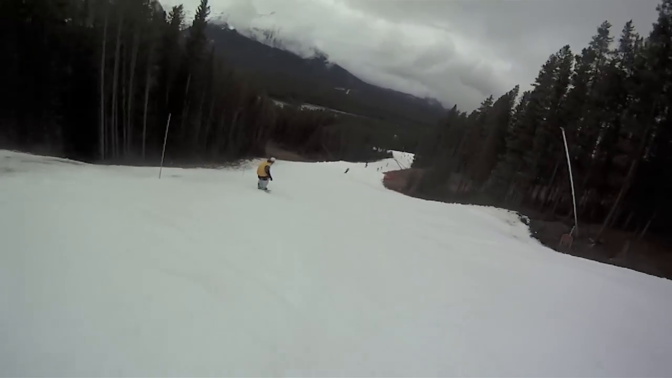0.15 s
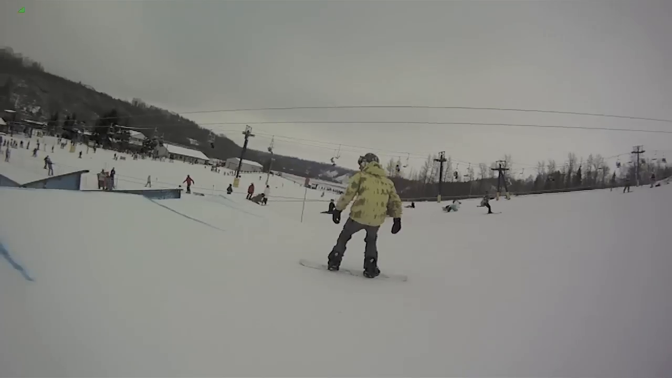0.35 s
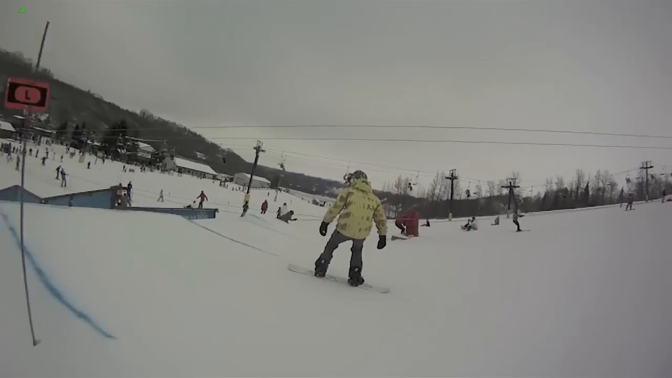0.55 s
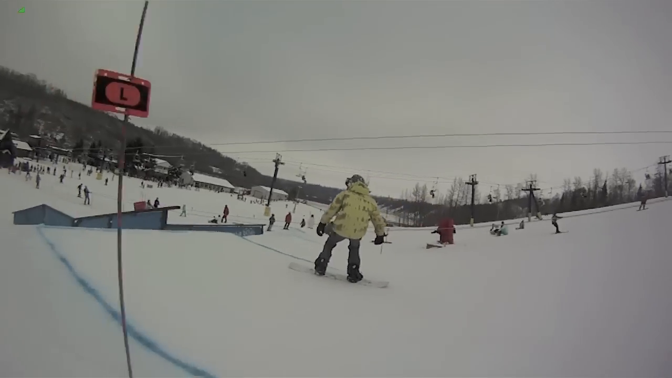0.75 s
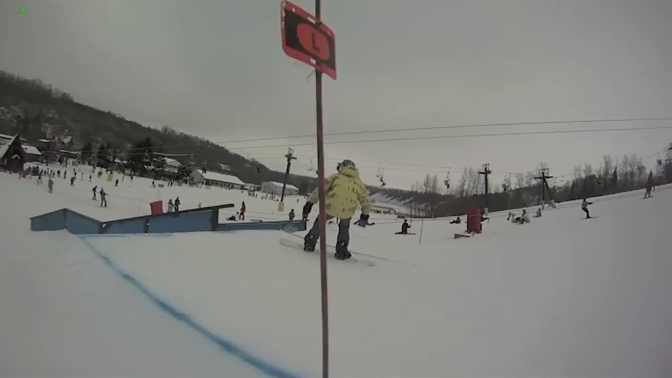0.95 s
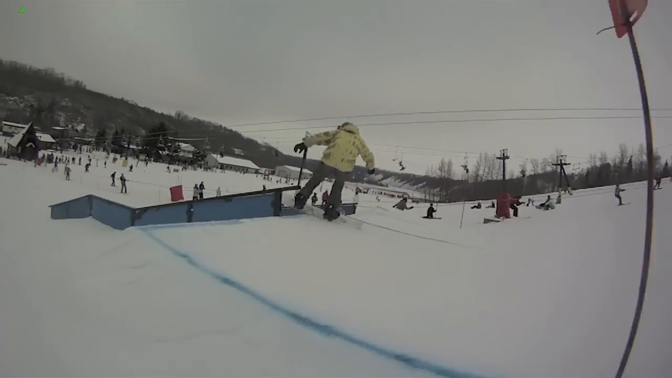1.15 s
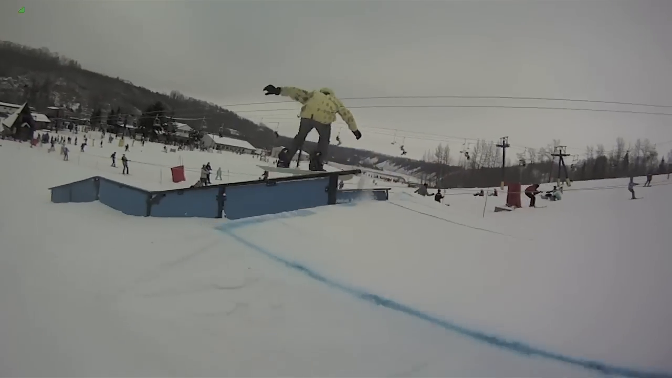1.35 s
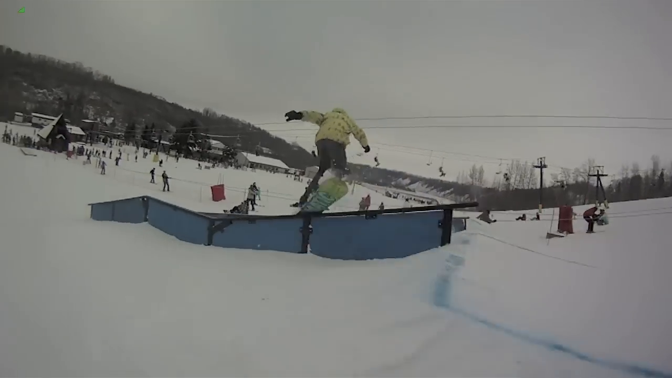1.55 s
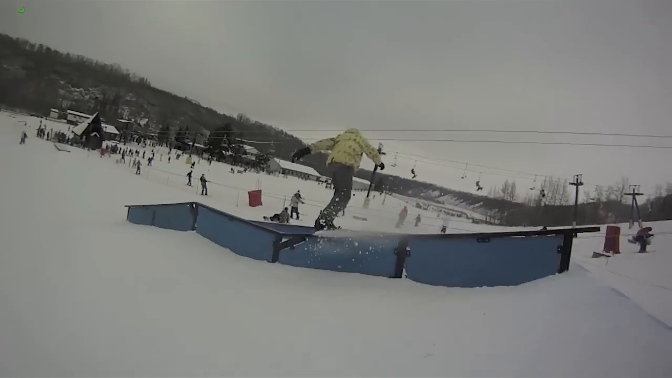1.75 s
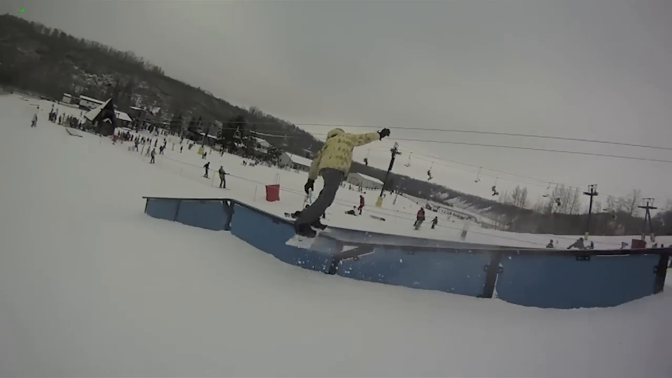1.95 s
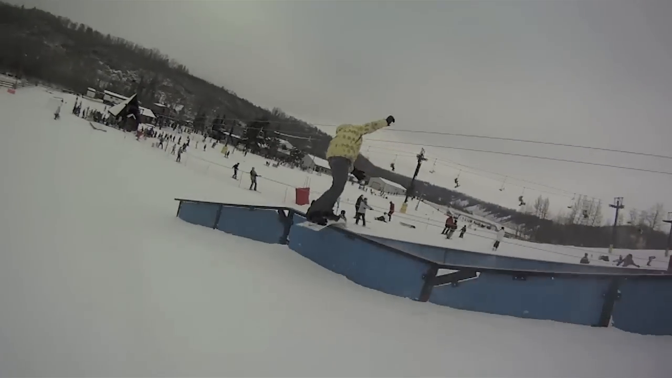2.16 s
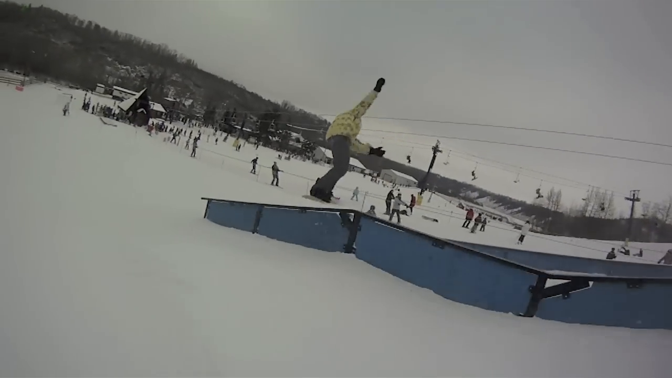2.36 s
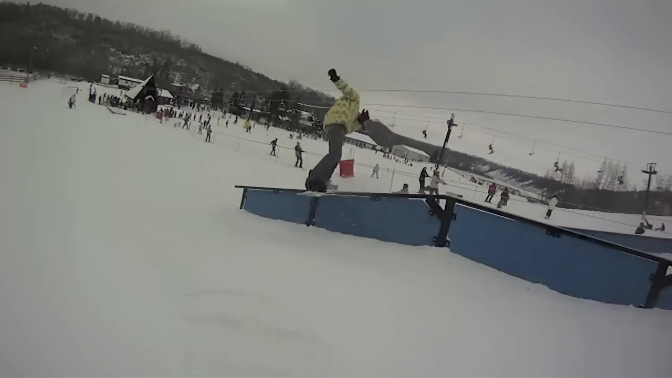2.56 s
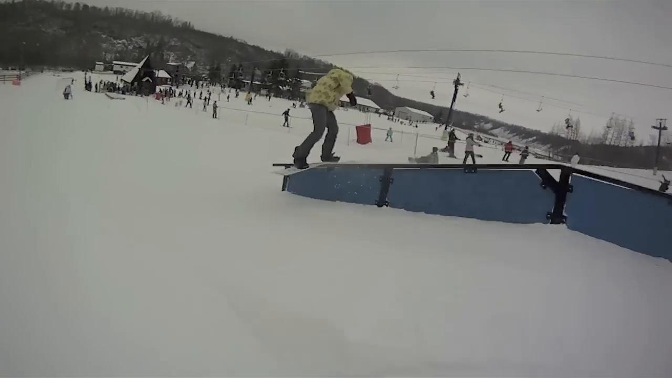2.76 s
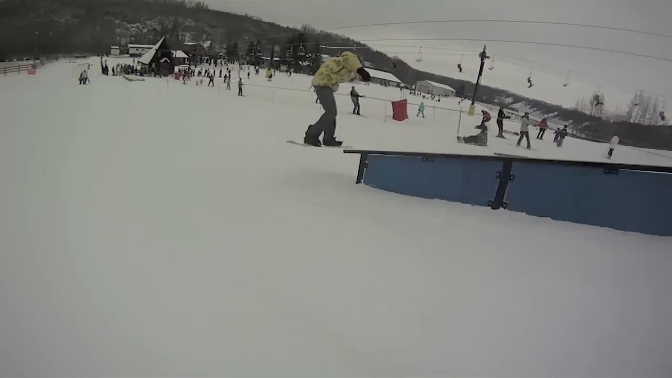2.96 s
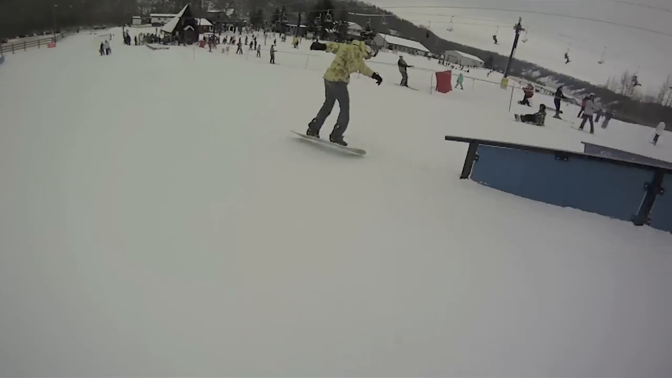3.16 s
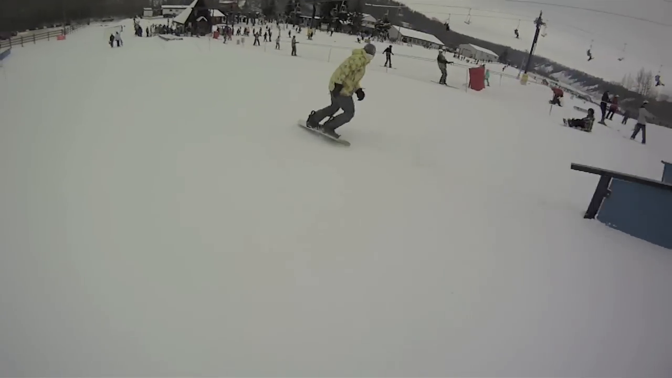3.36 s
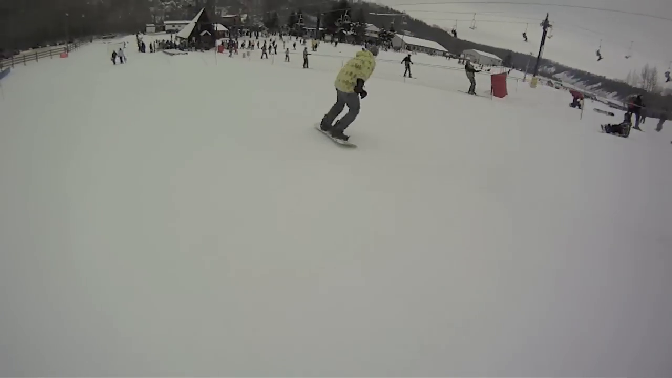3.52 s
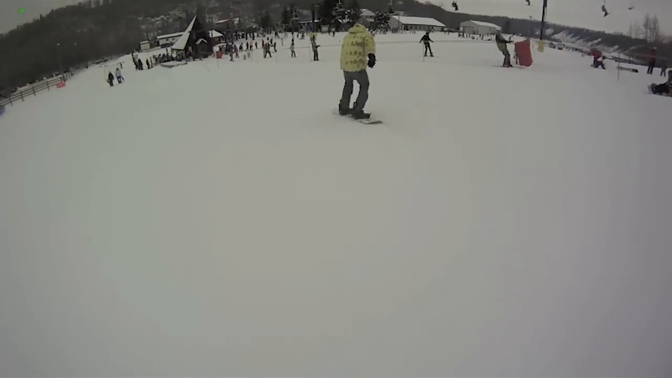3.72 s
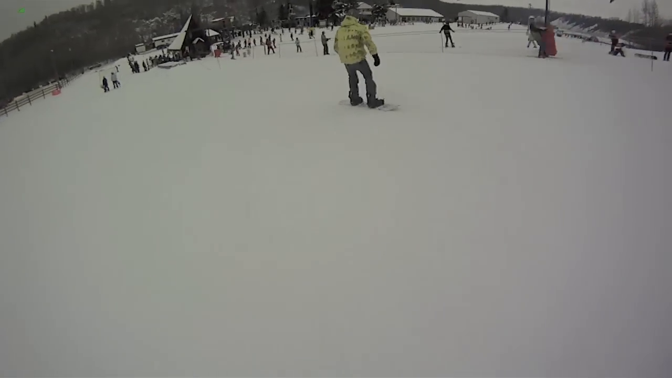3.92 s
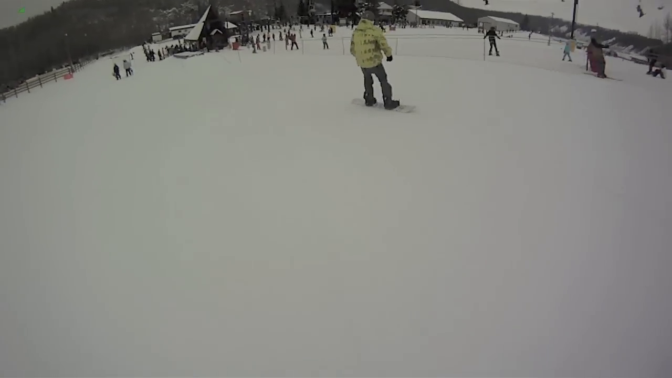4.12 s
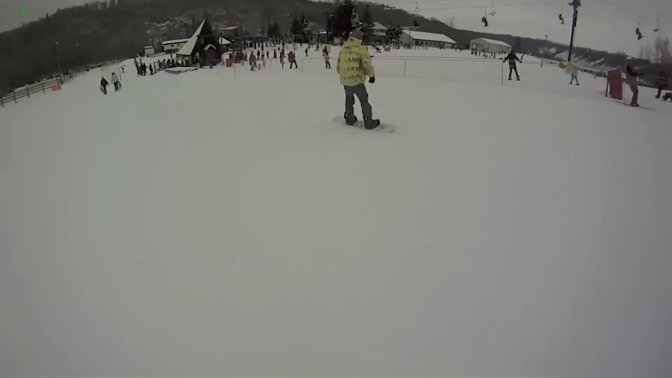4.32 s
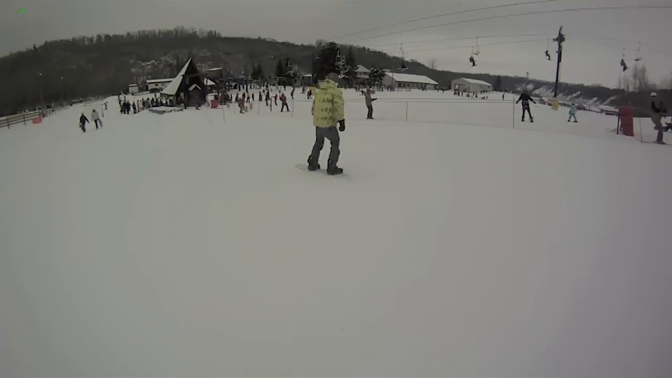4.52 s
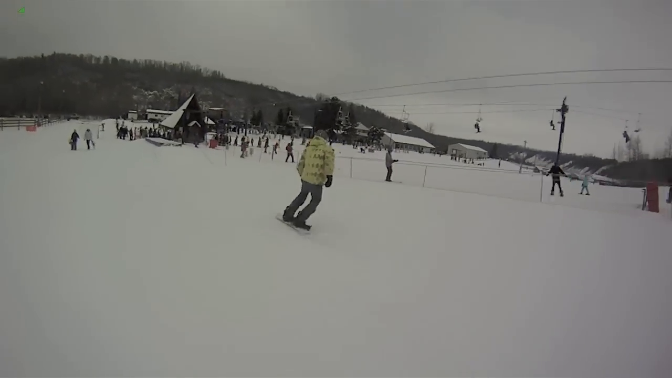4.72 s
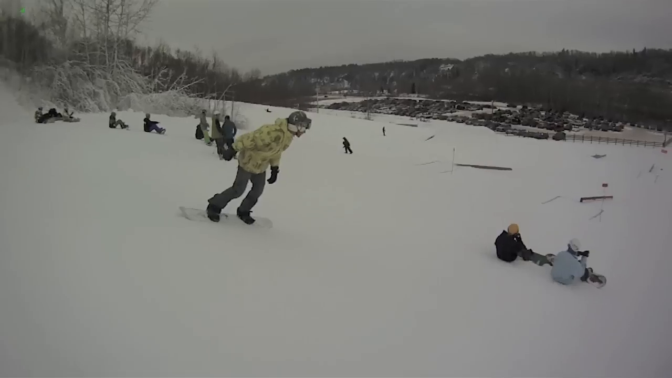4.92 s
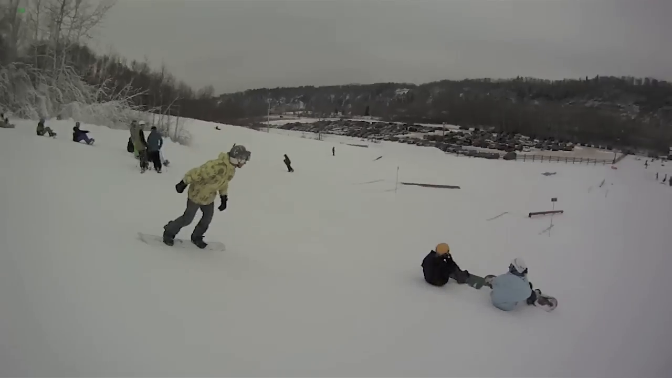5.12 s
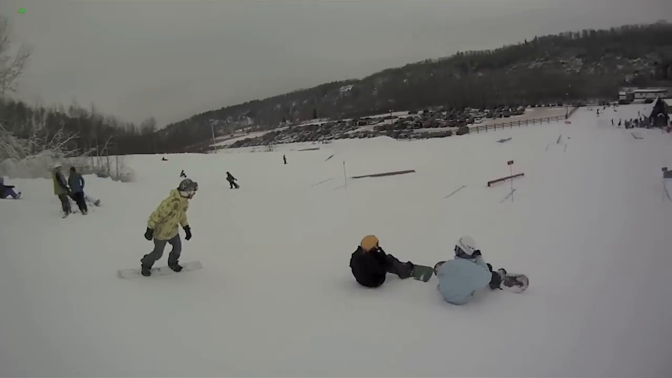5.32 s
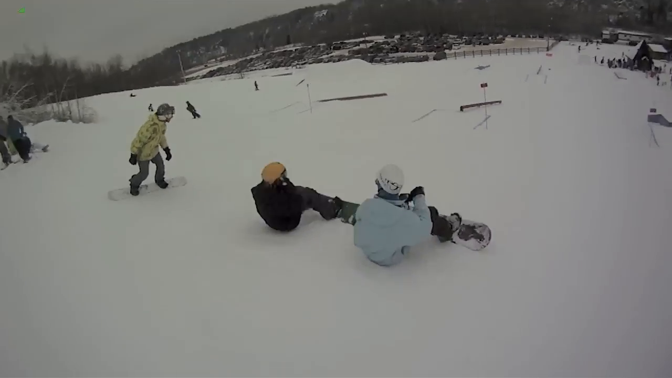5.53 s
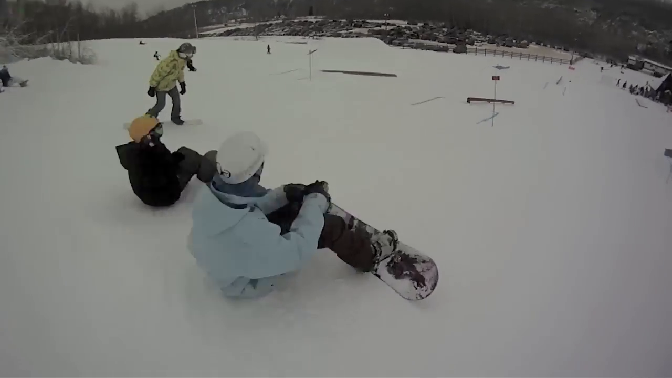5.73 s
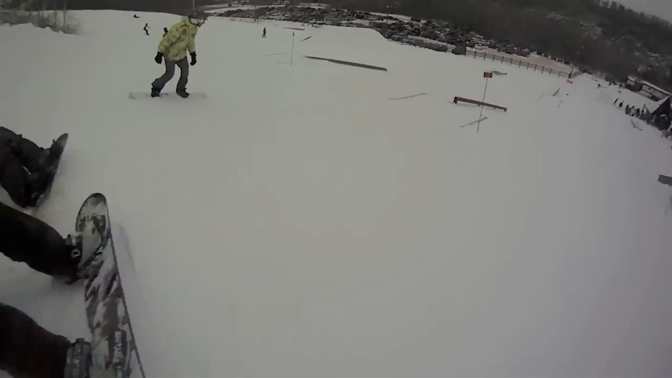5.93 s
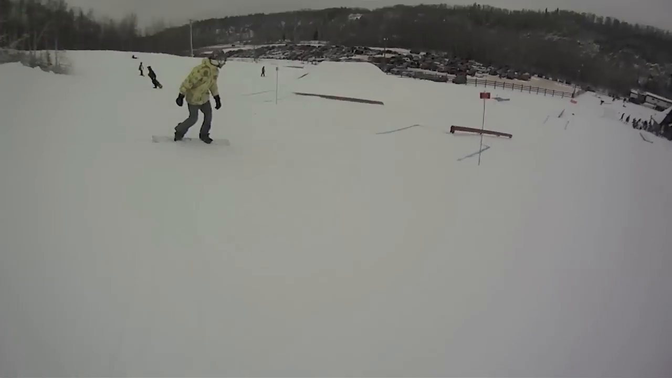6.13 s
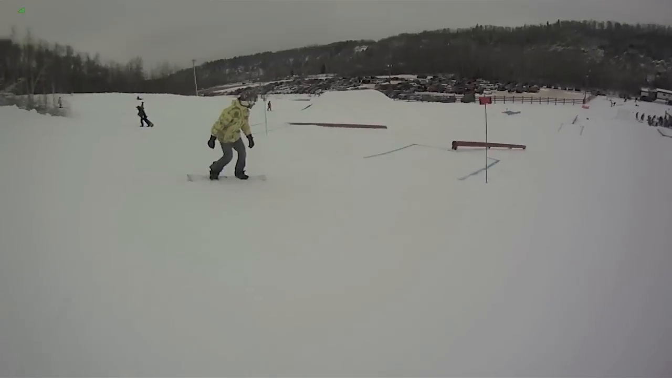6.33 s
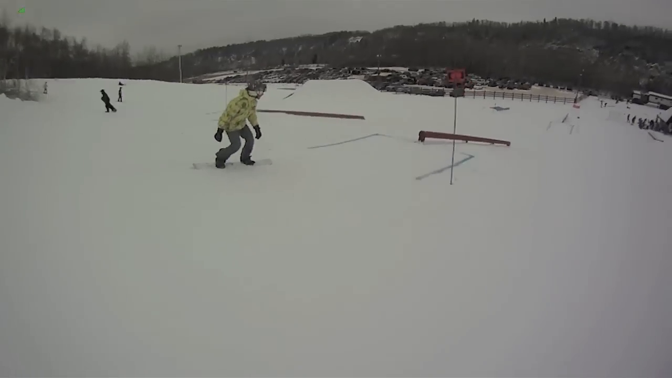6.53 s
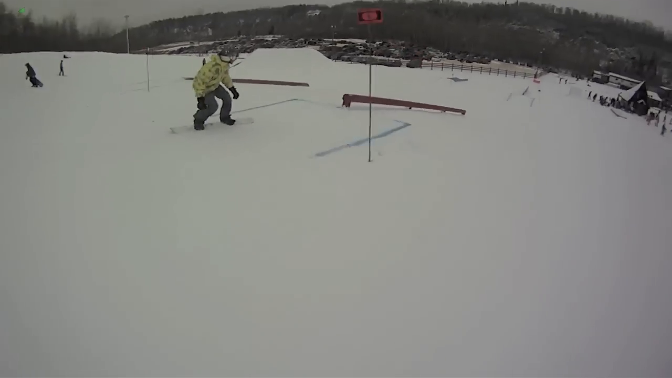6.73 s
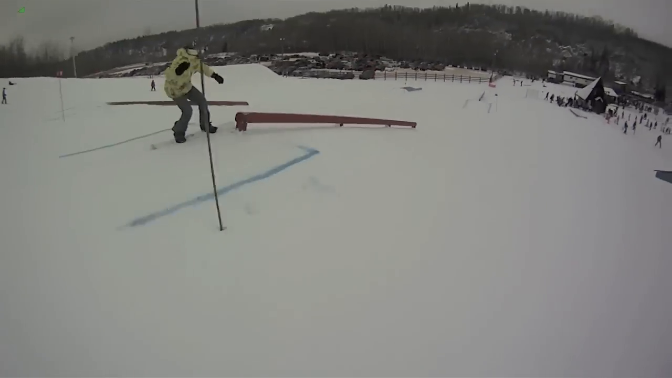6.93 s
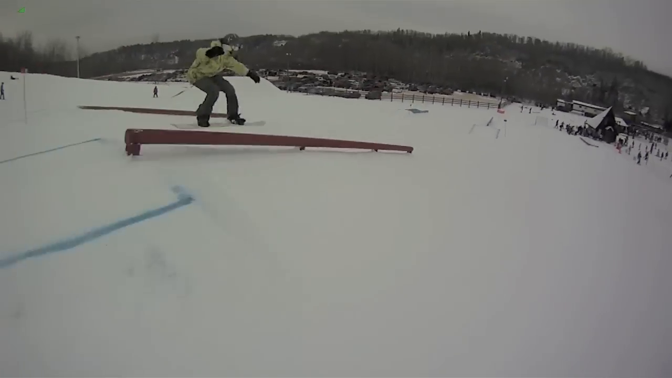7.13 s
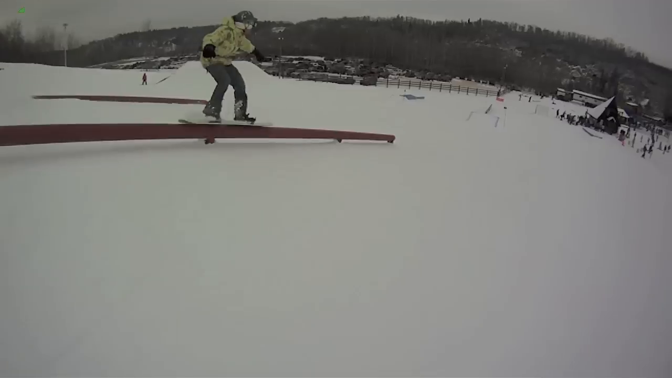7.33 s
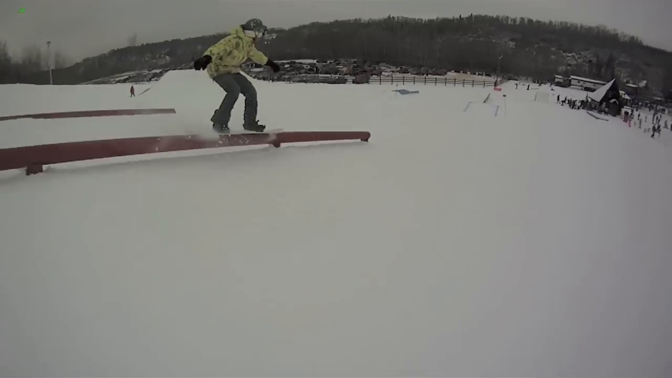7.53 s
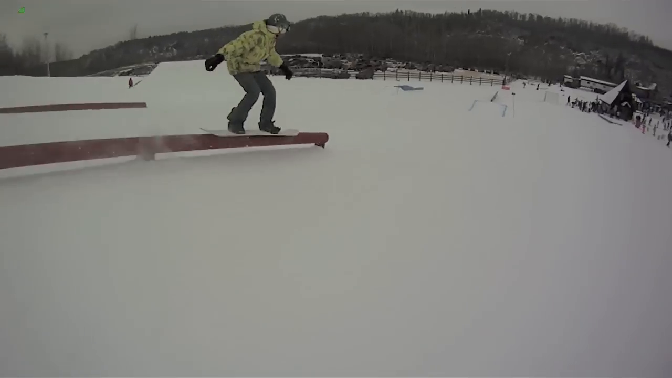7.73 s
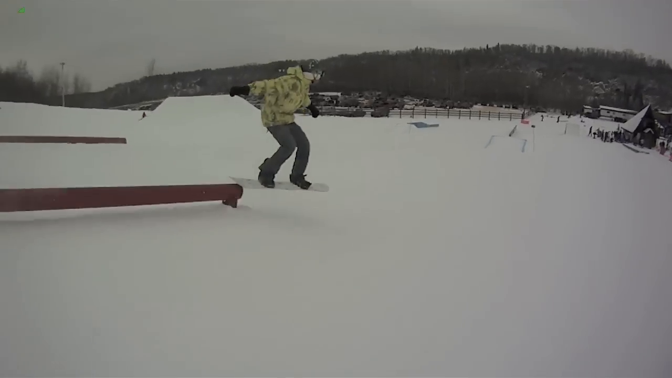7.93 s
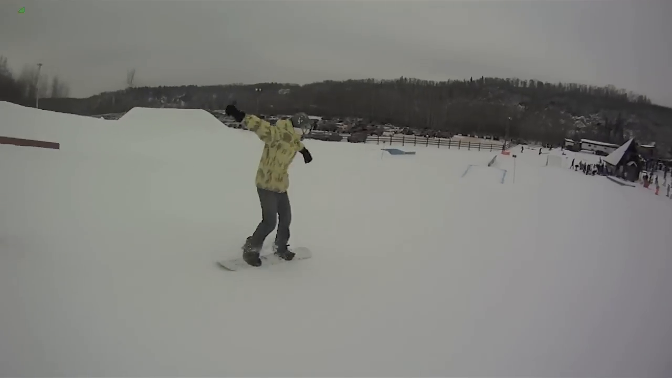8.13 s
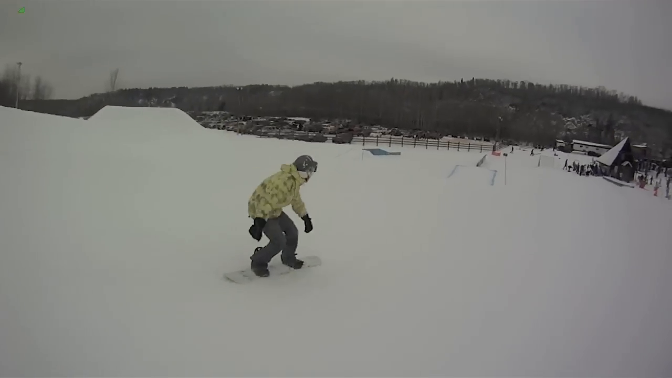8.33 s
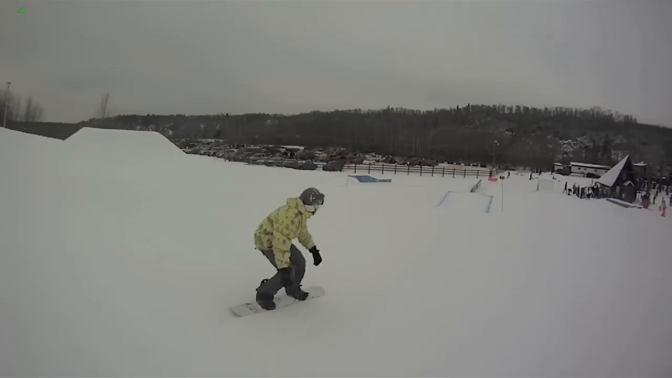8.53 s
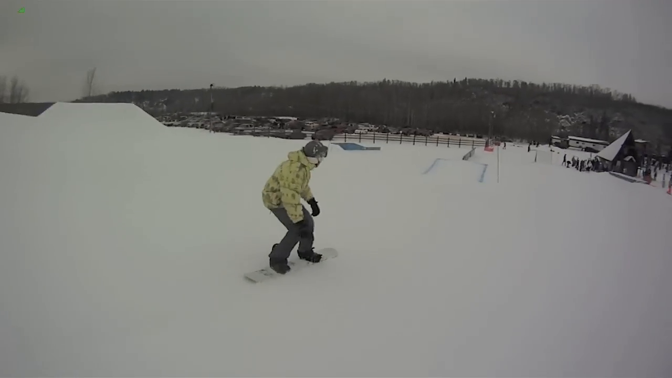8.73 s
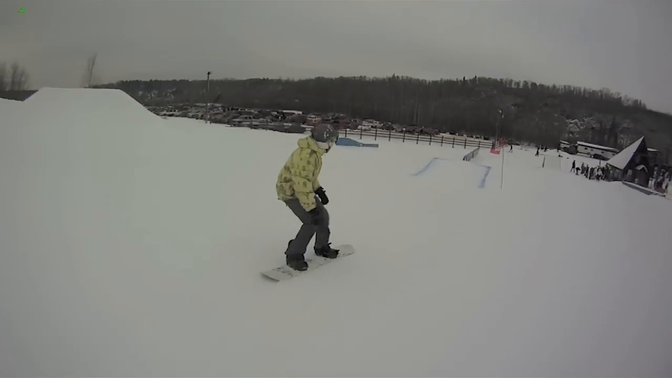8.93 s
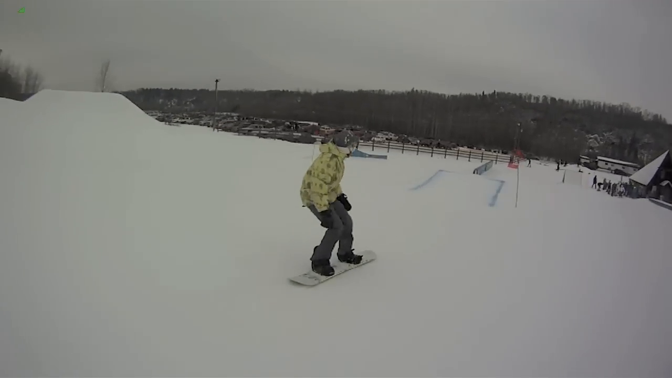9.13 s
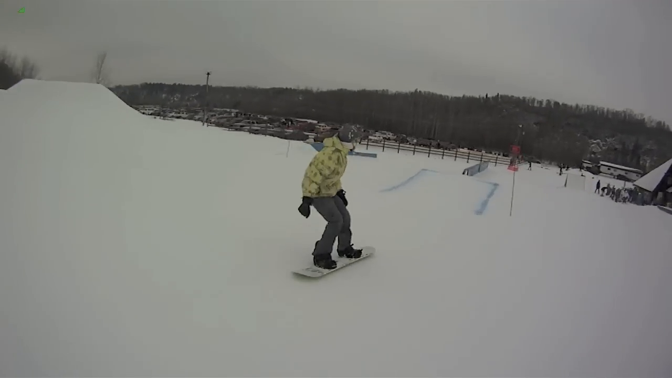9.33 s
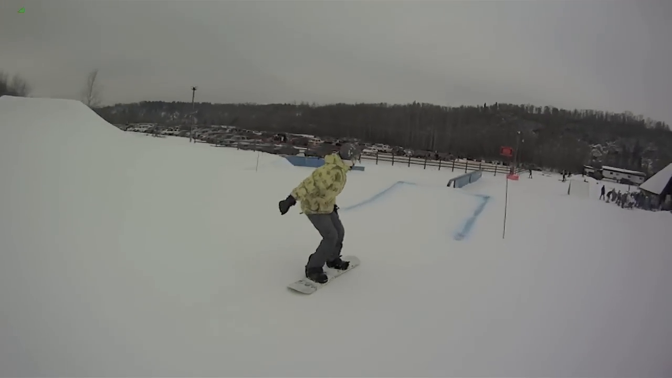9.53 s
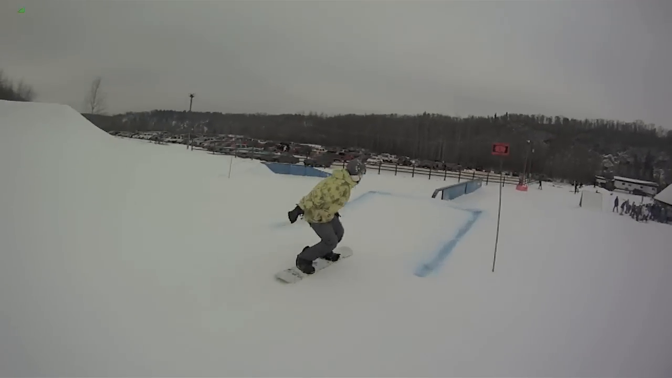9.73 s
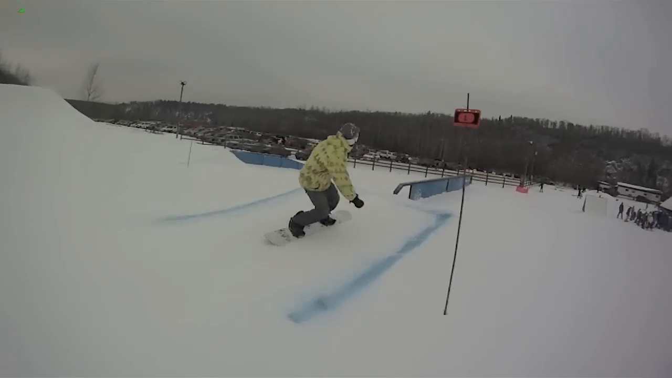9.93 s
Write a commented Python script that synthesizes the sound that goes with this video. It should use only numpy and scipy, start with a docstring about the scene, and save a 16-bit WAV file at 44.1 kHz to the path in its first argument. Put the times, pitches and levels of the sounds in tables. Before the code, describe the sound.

On an open ski slope, a close cased action-camera microphone picks up a snowboard's hissing edge, then a quieter glide with wind buffeting. A hard clack lands on a box, small knocks and soft bumps follow, then a heavy crunching carve. The base drone grows louder, a sharp rattling knock meets a steel rail with a faint ring, and scraping continues to the end.

```python
"""A scraping, hissing board edge is heard first; then the base drones as a snowboard glides down a packed slope.
Filtered noise makes the drone, wind and rumble; random grains within noise make the scrape, spray and crunches.
Sharp knocks, soft bumps and a faint steel rail reach a cased microphone, and sharp, bright ticks crackle on top.
The level of all but the ticks dips briefly twice. Slow sampling with each sample held
mirrors all but the ticks into a gritty treble."""
import sys
import numpy as np
from scipy import signal
from scipy.io import wavfile
from scipy.ndimage import uniform_filter1d

SR = 44100
rng = np.random.default_rng(int(sys.argv[2]) if len(sys.argv) > 2 else 0)


def master_out(mix):
    """Clip the mix to full scale and print it as 16-bit PCM to the path in sys.argv[1]."""
    frames = np.transpose(np.atleast_2d(mix))
    ceiling = np.clip(frames, -1, 1)
    pcm = np.round(ceiling * 32767).astype(np.int16)
    wavfile.write(sys.argv[1], SR, pcm)


N = 439677
T = np.arange(N) / SR


def amp(db):
    """Logarithmic level: decibels to an amplitude ratio."""
    return 10 ** (np.asarray(db) / 20)


def unit(x):
    """Power normalisation: scales to rms 1."""
    return x / np.sqrt(np.mean(x ** 2) + 1e-20)


def curves(*tables):
    """Linear interpolation: joins tables in time and returns each column sample by sample."""
    times, *columns = np.transpose(np.vstack(tables))
    return [np.interp(T, times, column) for column in columns]


def add(mix, start_s, sound):
    """Superposition: adds a sound to the mix from a given time."""
    part = mix[round(start_s * SR):][:len(sound)]
    part += sound[:len(part)]


def colour(x, spectrum, resonances=(), size=16384):
    """Minimum-phase filtering: a causal response from a smooth spectrum and resonant lifts."""
    hz = abs(np.fft.fftfreq(size, 1 / SR))
    points_hz, level_db = np.transpose(spectrum)
    db = np.interp(np.log(hz + 1), np.log(points_hz + 1), level_db)
    for centre_hz, width_hz, lift_db in resonances:
        db = db + lift_db / (1 + (2 * (hz - centre_hz) / width_hz) ** 2)
    # the Hilbert transform of the log magnitude gives the minimum phase
    log_response = np.conj(signal.hilbert(np.log(amp(db))))
    response = np.fft.ifft(np.exp(log_response)).real
    return signal.oaconvolve(x, response[:size // 2])[:len(x)]


def wander(per_s):
    """Random modulation: unevenness of rms 1 drawn anew per_s times a second and joined by lines."""
    draws = rng.standard_normal(N // 8)
    return unit(np.interp(T * per_s, np.arange(N // 8), draws))


def swell(peak_s, length_s):
    """Smooth envelope: rises to 1 at peak_s and has fallen to 1/e at length_s on either side."""
    squareness = 2.44  # 2 = a bell shape, more = a flatter top
    distance = np.minimum(abs((T - peak_s) / length_s), 5)
    return np.exp(-distance ** squareness)


def crunch(grains_per_s, spread_db, share):
    """Shot noise: snow crystals break as separate grains of uneven size within a smooth hiss."""
    sizes = amp(spread_db * np.minimum(rng.exponential(1, N), 4))
    breaks = rng.random(N) < grains_per_s / SR
    grains = sizes * rng.choice([-1, 1], N) * breaks
    hiss = rng.standard_normal(N)
    return np.sqrt(share) * unit(grains) + np.sqrt(1 - share) * hiss


# slow turbulence: (frequency [Hz], relative level [dB per Hz])
WIND = [(2, -29), (9, -1), (23, 0.5), (38, -3), (52, -12.5), (70, -19.5), (110, -32), (200, -49),
        (600, -83)]
# wind strength on the case: (time [s], level before the gain [dB])
GUSTS = [(0, -39.5), (0.22, -52), (0.47, -37), (0.7, -44), (1.4, -42.5), (2.4, -47.5), (2.62, -41),
         (3.1, -40), (4.2, -44), (4.85, -44.5), (5.15, -38), (5.85, -34.5), (6.2, -48), (6.75, -34),
         (7.15, -39), (7.38, -32.5), (7.75, -37.5), (9.68, -32.5), (9.9, -41.5)]


def wind():
    """Turbulent pressure: slow eddies push on the case with the strength of each gust."""
    gain_db = 2
    (wind_db,) = curves(GUSTS)
    eddies = unit(colour(rng.standard_normal(N), WIND))
    # evens out the eddies within one gust
    eddies /= np.sqrt(uniform_filter1d(eddies ** 2, size=6000) + 0.024)
    return eddies * amp(wind_db + gain_db)


# fast eddies and case shake: (frequency [Hz], relative level [dB per Hz])
EDDIES = [(30, -27), (70, 0.5), (105, -1), (160, -4), (250, -13), (600, -47)]
# the board rumbles along the box, then the rail: (middle [s], time to 1/e either side [s], level [dB])
SLIDES = [(2.25, 0.38, -56.5), (7.43, 0.11, -55)]


def flutter():
    """Random forcing: fast eddies rise with the wind; bumps and slides shake the case with like noise."""
    mean_db, follows = -59.5, 0.25  # level in average wind; rise [dB per dB of wind]
    shake_db, shake_s = -21, 0.12  # level relative to the bump; decay time to 1/e
    (wind_db,) = curves(GUSTS)
    flutter_db = mean_db + follows * (wind_db - wind_db.mean()) + 1.3 * wander(per_s=14)
    shake = np.zeros(N)
    for bump_s, db, _ in BUMPS:
        shake += amp(db + shake_db) * (T > bump_s) * np.exp(-abs(T - bump_s) / shake_s)
    for middle_s, length_s, db in SLIDES:
        shake += amp(db) * swell(middle_s, length_s)
    # independent causes add in power
    return unit(colour(rng.standard_normal(N), EDDIES)) * np.hypot(amp(flutter_db), shake)


# low ride noise: (frequency [Hz], relative level [dB per Hz])
RUMBLE = [(50, -37), (130, -8), (210, -1.5), (310, 0.5), (450, -7.5), (700, -8.5), (900, -10.5),
          (1300, -18), (3000, -43)]
# rumble by how uneven the snow is: (time [s], level [dB])
ROUGH = [(0, -63.5), (0.8, -56.5), (1.15, -58), (2.4, -61), (3.7, -56), (4.5, -58), (6.3, -59),
         (7.7, -59.5), (9.97, -55.5)]


def rumble():
    """Roughness excitation: uneven snow drives a lumpy low noise whose level shifts in each bite."""
    (rumble_db,) = curves(ROUGH)
    rumble_db = rumble_db + 0.8 * wander(per_s=40) + 1.0 * wander(per_s=12)
    for bite_s, length_s, *_, rise_db in BITES:
        rumble_db += rise_db * swell(bite_s, length_s)
    return unit(colour(rng.standard_normal(N), RUMBLE)) * amp(rumble_db)


# tick colour: (frequency [Hz], relative level [dB per Hz])
TICK = [(300, -42), (1200, -16), (2000, 11.5), (3000, -3), (4500, 5.5), (6000, -4.5), (7500, -1),
        (10000, -7), (12000, -32), (14500, -11), (16000, -20)]
# the loudest dry ticks: (time [s], level before colouring and gain [dB])
TICKS = [(1.2755, -30), (1.3608, -33.5), (1.3962, -30), (1.8904, -36), (2.5396, -33.5), (2.6514, -32),
         (3.0709, -31), (4.1909, -33), (4.7815, -32), (5.3487, -32), (5.4735, -32), (5.5094, -25.5),
         (5.6261, -29.5), (5.7234, -33), (5.8311, -27), (6.0931, -26), (6.2372, -30), (6.356, -33),
         (6.7391, -26), (7.2833, -24), (7.3208, -9.5), (7.3532, -21)]
# stretches with faint random crackle: (start [s], end [s], rate [ticks per s])
CRACKLE = [(1.3, 4.3, 5), (5.1, 6.4, 18)]


def ticks(level_db=12.0, repeat_db=-4, decay_s=.0003, gap_s=.004, count=3):
    """Click runs: sharp wide-band ticks in quick, ever weaker runs, with random faint crackle."""
    out, t = np.zeros(N), T[:256]
    per_s = sum(rate * (T > start) * (T < end) for start, end, rate in CRACKLE)
    crackles = rng.random(N) < per_s / SR
    crackle_db = rng.uniform(-40.3, -37.0, N)  # before colouring and gain, as in TICKS
    for tick_s, db in [*TICKS, *zip(T[crackles], crackle_db[crackles])]:
        for k in range(count):
            click = rng.choice([-1., 1.], len(t)) * t * np.exp(-t / decay_s)
            click /= np.linalg.norm(click)
            add(out, tick_s + gap_s * (k + .5 * rng.random()), amp(db + k * repeat_db) * click)
    return amp(level_db) * colour(out, TICK, size=2048)


# soft bumps: (time [s], peak [dB], pulse width [s])
BUMPS = [(1.548, -33, 0.0006), (2.56, -35, 0.0024), (3.2062, -30.5, 0.00084), (4.634, -35.5, 0.001),
         (4.713, -35, 0.001), (4.979, -29.5, 0.0015), (5.012, -33, 0.001), (5.032, -31.5, 0.0011),
         (6.703, -39, 0.00064), (7.32, -26, 0.00025), (8.181, -33, 0.00089), (8.548, -38, 0.0005)]


def bumps():
    """Impulse and recoil: uneven snow jolts the case with one push and its rebound."""
    out = np.zeros(N)
    for bump_s, db, width_s in BUMPS:
        u = T[:2048] / width_s - 3
        pulse = -u * np.exp((1 - u ** 2) / 2)  # peaks of +1 and -1
        add(out, bump_s - 2 * width_s, amp(db) * pulse)
    return out


# modes of the steel rail: (frequency [Hz], level at the strike [dB], 60 dB decay time [s])
RAIL = [(727, -49.5, 1.0), (2060, -46, .4), (3050, -47, .35), (3910, -43, 0.5)]


def rail():
    """Modal decay: the steel rail rings faintly in dying sine modes after the board lands on it."""
    out, t = np.zeros(N), T[:SR]
    ring = sum(amp(db - 60 * t / t60) * np.sin(2 * np.pi * hz * t) for hz, db, t60 in RAIL)
    add(out, 7.32, ring)
    return out


# hard knocks: (time [s], level before the scaling by length [dB], length of the contact [s],
# power share of squeaky ring [0-1], brightness tilt [dB per octave])
KNOCKS = [(1.5315, -29, 0.0088, 0.04, 0), (1.536, -11.5, 0.0035, 0.08, 0), (1.5413, -31, 0.011, 0, -1.5),
          (1.5572, -27, 0.0034, 0, -1), (1.8956, -29.5, 0.0019, 0.03, 1.5), (1.8972, -38, 0.0085, 0, 1),
          (2.5023, -28.5, 0.0052, 0.9, 0), (3.071, -47, 0.0076, 0.7, 0), (5.0107, -35.5, 0.0033, 0.3, -9),
          (5.0307, -32, 0.0041, 0, -9), (7.284, -30.5, 0.003, 0.3, 4), (7.3153, -28, 0.0066, 0.3, 3),
          (7.318, -26, 0.0045, 0.2, -2.5), (7.322, -24.5, 0.0038, 0.08, -3), (7.3292, -20, 0.0033, 0.18, 8)]
# knock colour: (frequency [Hz], relative level [dB per Hz])
KNOCK = [(60, -33.5), (400, -26), (680, -13.5), (1100, -15.5), (1500, -5.5), (2300, -9), (2800, -2),
         (3200, -4), (3700, -1), (4400, -11), (5200, -17), (6000, -26)]
# what a knock rings: (frequency [Hz], width [Hz], lift [dB])
KNOCK_RINGS = [(810, 69, 7.5), (1570, 200, 2), (1950, 180, 8), (2720, 210, 6), (3140, 120, 1),
               (3620, 160, 4), (4380, 120, 4), (4640, 180, 7)]
# tones of a squeaky contact: (frequency [Hz], relative level [dB])
SQUEAK = [(1930, 0), (3630, -9.5), (4250, -19)]


def knocks():
    """Impact excitation: a dying rattle of hard contacts rings the case, and some contacts squeak."""
    out, t = np.zeros(N), T[:6000]
    tones = sum(amp(db) * np.sin(2 * np.pi * hz * t) for hz, db in SQUEAK)
    binding_rattle = amp(-25) * np.exp(-t / 0.043)  # the bindings rattle on
    tail = .05 * np.exp(-t / 0.0085) + binding_rattle
    for knock_s, db, length_s, squeak_share, bright_db in KNOCKS:
        contact = np.exp(-(t / length_s) ** 2) + tail
        spectrum = [(hz, level + bright_db * np.log2(hz)) for hz, level in KNOCK]
        hits = rng.choice([-1., 1.], len(t)) * contact
        rattle = unit(colour(hits, spectrum, KNOCK_RINGS, size=2048))
        squeak = unit(tones * contact)
        sound = np.sqrt(1 - squeak_share) * rattle + np.sqrt(squeak_share) * squeak
        # a longer contact carries more energy
        add(out, knock_s, amp(db) * np.sqrt(length_s / t[-1]) * sound)
    return out


# the board digs into loose snow: (deepest bite [s], time to 1/e either side [s], crunch level [dB],
# crunch centre [Hz], rise of scrape and spray [dB], rise of rumble [dB])
BITES = [(0.2, 0.063, -53, 3700, 6.5, 5), (0.51, 0.077, -57, 280, 0.5, 6),
         (3.212, 0.016, -46.5, 3700, -1, 8.5), (3.308, 0.058, -48, 3500, -2, -1),
         (4.755, 0.14, -46, 1850, 3.5, -1.5), (5.11, 0.068, -37.5, 1650, 13, 11),
         (5.848, 0.12, -54, 567, 9.5, 13), (6.744, 0.018, -46, 1900, 5, 1),
         (8.174, 0.025, -48, 450, 0.5, 8), (8.56, .06, -59, 600, 1, 5)]


def bites():
    """Band-limited fracture noise: coarse crunches, low where the board packs snow, high where it sprays it."""
    out = np.zeros(N)
    grit = crunch(grains_per_s=1000, spread_db=6, share=0.41)
    for bite_s, length_s, db, hz, *_ in BITES:
        b, a = signal.butter(2, [hz / 1.3, hz * 1.3], "band", fs=SR)
        band = unit(signal.lfilter(b, a, grit))
        out += band * amp(db) * swell(bite_s, length_s)
    return out


# the board on the snow, in three successive tables, levels before the layer gains:
# (time [s], drone of the base [dB], scrape of the edge [dB], fine spray [dB])
RIDE = [
    [(0.0, -60, -54.5, -46), (0.092, -62, -52.5, -48.5), (0.27, -63, -54, -52.5)],
    [(0.41, -58, -54, -56), (0.67, -56.5, -54.5, -56.5), (1.16, -58, -54, -53.5), (1.39, -55, -54, -56),
     (2.24, -56.5, -57, -58.5), (2.82, -54, -54.5, -57.5), (4.08, -56.5, -54.5, -55.5),
     (4.65, -54, -52.5, -58.5), (4.88, -56.5, -54.5, -61)],
    [(5.22, -57, -46.5, -50.5), (5.44, -52, -50.5, -56), (5.97, -44.5, -51.5, -55), (6.11, -46.5, -53, -57),
     (7.6, -42.5, -47, -47), (7.98, -43.5, -48, -49.5), (9.44, -45, -44.5, -46.5),
     (9.97, -46.5, -45, -48.5)],
]
# layer colours: (frequency [Hz], relative level [dB per Hz])
DRONE = [(300, -29), (800, -28.5), (1000, -25), (1130, -4.5), (1245, 0), (1370, -5), (1550, -12.5),
         (2200, -15), (2800, -24.5), (3700, -23), (4400, -32), (5000, -19.5), (5500, -32.5), (6000, -47)]
SCRAPE = [(150, -44), (450, -9), (800, -9.5), (1100, 1.5), (1600, -2.5), (2200, 2.5), (2600, -5),
          (3100, -10.5), (4000, -14.5), (6000, -29.5)]
SPRAY = [(1500, -34.5), (2600, -6), (3200, -3), (3800, -2), (4400, -9.5), (5000, -6.5), (5500, -9),
         (6000, -16)]
# resonances of the case: (frequency [Hz], width [Hz], lift [dB])
CASE = [(1180, 170, 0.5), (1960, 210, 1), (2530, 99, 2), (2740, 82, 1), (3110, 130, 3.5), (3610, 240, 6.5),
        (4800, 110, 4.5), (4970, 200, 3.5)]


def board():
    """Sliding friction: the base drones; edge scrape and spray chatter together over the same ridges."""
    drone_gain_db, scrape_gain_db, spray_gain_db = 2.5, 1.5, 1.3
    drone_db, scrape_db, spray_db = curves(*RIDE)
    pressure_db = 1.3 * wander(per_s=65) + 0.41 * wander(per_s=11)
    for bite_s, length_s, _, _, rise_db, _ in BITES:
        pressure_db += rise_db * swell(bite_s, length_s)
    drone = unit(colour(rng.standard_normal(N), DRONE, CASE))
    drone *= amp(drone_db + drone_gain_db + 1.17 * wander(per_s=22))
    scrape = unit(colour(crunch(grains_per_s=2500, spread_db=3.5, share=0.28), SCRAPE, CASE))
    scrape *= amp(scrape_db + scrape_gain_db + pressure_db)
    spray = unit(colour(crunch(grains_per_s=1800, spread_db=2.5, share=0.58), SPRAY, CASE))
    spray *= amp(spray_db + spray_gain_db + pressure_db)
    return drone + scrape + spray


# instants at which the level dips briefly: (time [s])
FADES = [0.335, 4.941]


def scene():
    """Superposition: sums all sources but the ticks and dips their level to a twentieth at each fade."""
    fade = np.ones(N)
    for dip_s in FADES:
        fade *= np.minimum(abs(T - dip_s) / .07 + .05, 1)
    background = wind() + flutter() + rumble()
    events = bumps() + rail() + knocks() + bites()
    return ((background + events + board()) * fade)[None]


def record(dry):
    """Zero-order hold: slow held samples mirror the treble; ticks join before the final low-pass."""
    hold_hz, edge_hz = 12000, 15400
    slow = signal.resample_poly(dry[0], hold_hz, SR, window=("kaiser", 3))
    held = signal.resample_poly(np.repeat(slow, 4), SR, 4 * hold_hz)[:N]
    low_pass = signal.firwin(511, edge_hz, window=("kaiser", 9), fs=SR)
    return signal.oaconvolve(held + ticks(), low_pass, "same")[None]


dry = scene()
out = record(dry)
master_out(out)
```